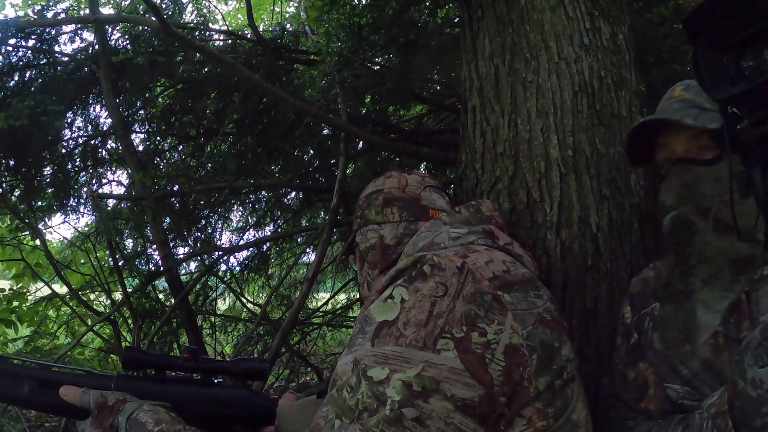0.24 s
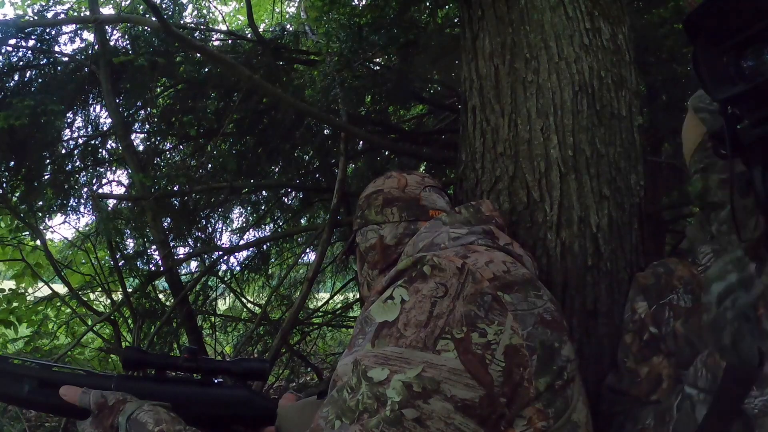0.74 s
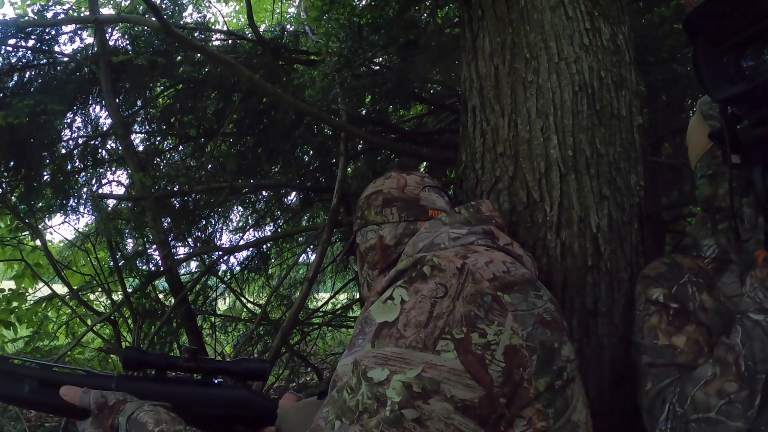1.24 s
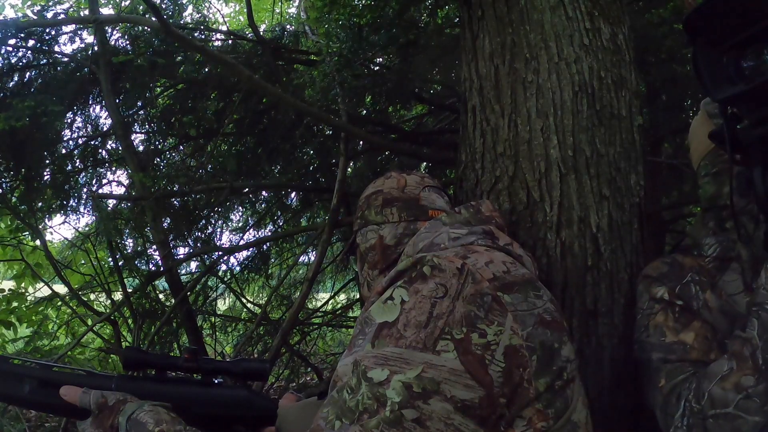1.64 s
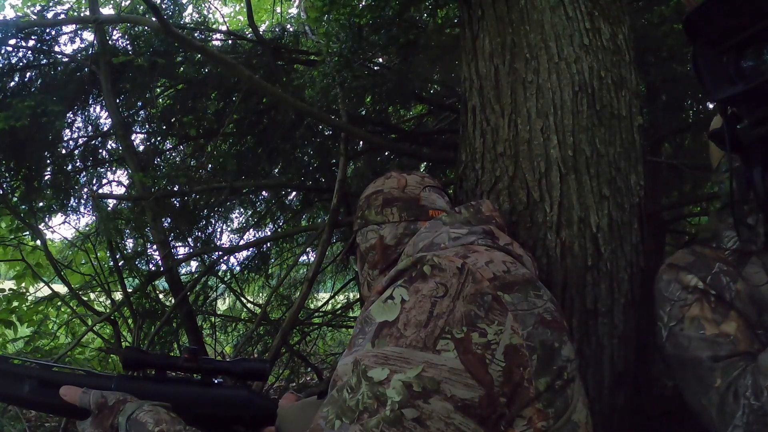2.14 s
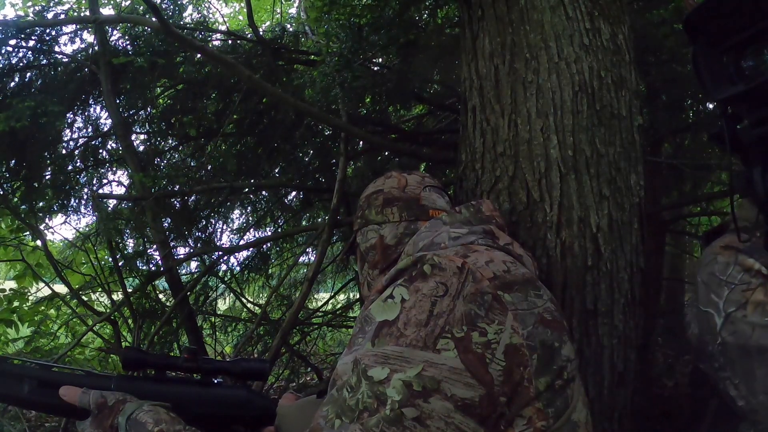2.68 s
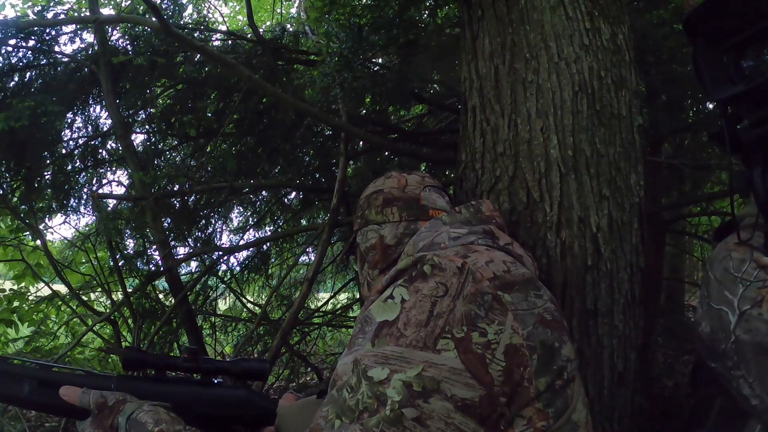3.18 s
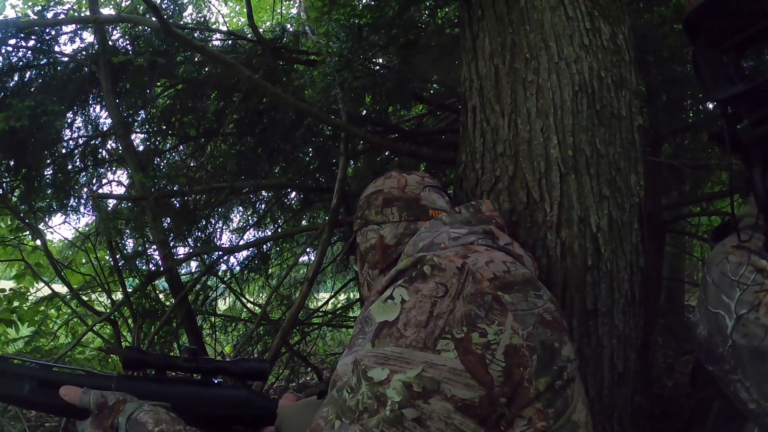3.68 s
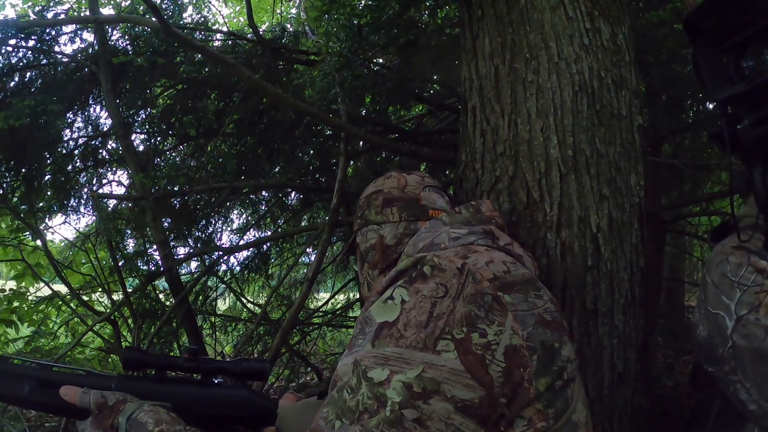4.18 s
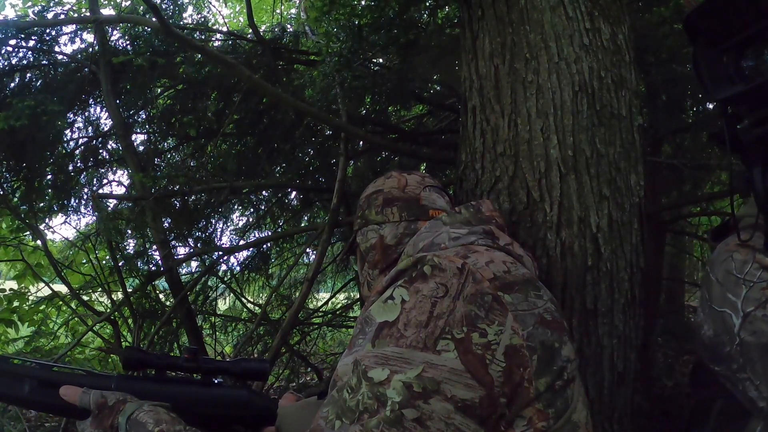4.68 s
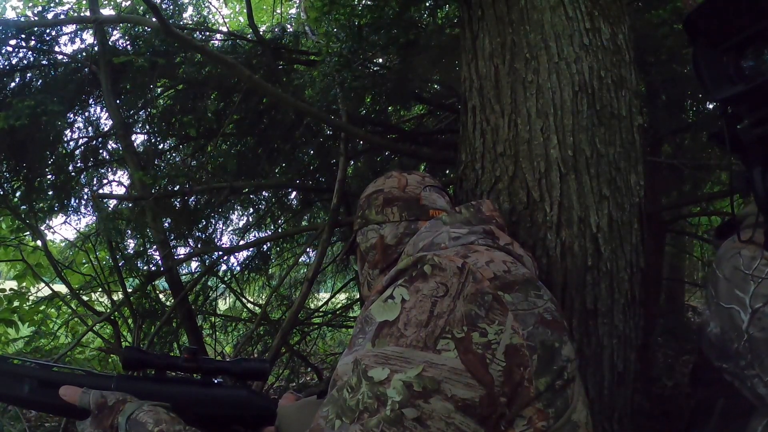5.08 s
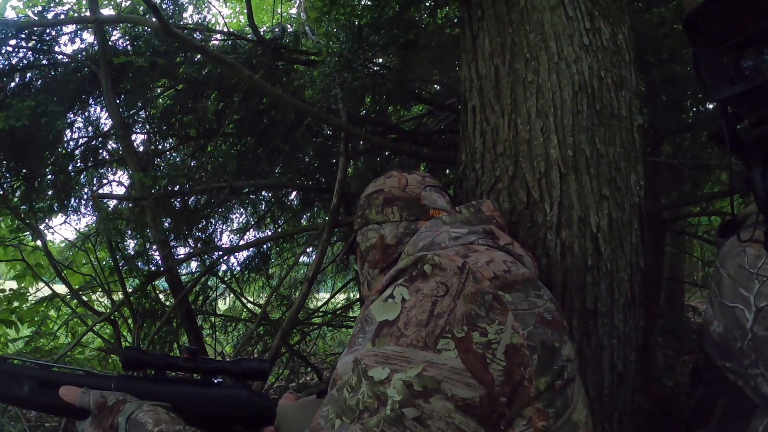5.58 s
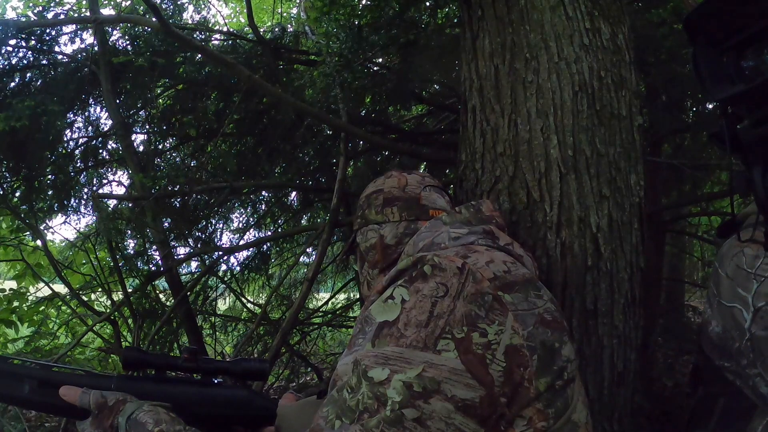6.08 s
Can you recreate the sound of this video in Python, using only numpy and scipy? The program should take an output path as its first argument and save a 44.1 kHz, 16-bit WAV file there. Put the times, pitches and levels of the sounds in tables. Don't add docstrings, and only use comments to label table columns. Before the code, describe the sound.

Summer woods with soft leaf hiss, a low distant drone and thin gliding songbirds. Cloth rubs on bark. A turkey mouth call, close and slightly right, clicks and slides a hoarse whistle, purrs briefly, then gives separate sharp clucks. After a short pause come nine loud, raspy yelps, about three a second, each breaking into loose slaps and a tiny chirp. Faint echo off the trunks.

```python
import sys
import numpy as np
from scipy import signal
from scipy.fft import rfft, irfft, next_fast_len
from scipy.io import wavfile
from scipy.ndimage import uniform_filter1d, minimum_filter1d, map_coordinates

SR = 44100
rng = np.random.default_rng(int(sys.argv[2]) if len(sys.argv) > 2 else 0)


def to_linear_factor(level_db):
    exponent = np.asarray(level_db, float) / 20
    return 10 ** exponent


def materialize(psi):
    bounded = np.clip(np.atleast_2d(psi).T, -1, 1)
    quanta = np.round(bounded * 32767).astype(np.int16)
    wavfile.write(sys.argv[1], SR, quanta)


N = 279153

# (time [s], length [s], pitch [Hz], level [dB], octave [dB])
CLUCKS = [
    (2.185, .012, 640, -6.5, -1.5),
    (2.518, .013, 700, -11, -18),
    (2.854, .017, 640, -10, -1),
]
# (time [s], start pitch [Hz], end pitch [Hz], level [dB], octave [dB])
PURR = [(1.385, 635, 555, -10.5, -7), (1.431, 620, 592, -7.5, -8), (1.4755, 650, 582, -8.5, -1),
        (1.5215, 662, 640, -7.5, -17), (1.5645, 668, 635, -8.5, -18), (1.609, 690, 665, -11, -16)]
PURR_NOTE_S = .026


def unit(x):
    return x / np.sqrt(np.mean(x ** 2) + 1e-20)


def along(points, hz):
    f, v = np.transpose(points)
    return np.interp(np.log(hz + 1), np.log(f + 1), v)


def columns(rows):
    s, *cols = np.transpose(rows)
    start = round(s[0] * SR)
    t = np.arange(start, min(round(s[-1] * SR), N)) / SR
    return start, t, [np.interp(t, s, c) for c in cols]


def wobble(rate, size=N):
    knots = rng.standard_normal(int(N * rate / SR) + 4)
    return map_coordinates(knots, [np.arange(size) * rate / SR])


def filtered(x, response):
    m = next_fast_len(N + 8192)
    return irfft(rfft(x, m) * response(np.fft.rfftfreq(m, 1 / SR)), m)[..., :N]


def add(track, start, x):
    track[start:start + len(x)] += x[:len(track) - start]


def rush(spectrum, patchy_db):
    # (frequency [Hz], correlation [0-1])
    likeness = [(25, .45), (45, .6), (70, .92), (180, .94), (550, .88), (950, .67), (1700, .56), (3000, .4),
                (12000, .3)]
    z = signal.stft(rng.standard_normal((2, N + 512)), nperseg=512)[2]
    field = uniform_filter1d(rng.standard_normal(z.shape[1:]), 6, 0)
    field = uniform_filter1d(field, 12, 1)
    pair = signal.istft(z * to_linear_factor(patchy_db * unit(field)), nperseg=512)[1][:, :N]

    def mid_side_gain(hz):
        turn = np.arccos(np.clip(along(likeness, hz), -1, 1)) / 2
        return to_linear_factor(along(spectrum, hz)) * [np.cos(turn), np.sin(turn)]

    mid, side = filtered(pair, mid_side_gain)
    return unit(np.array([mid + side, mid - side]))


def woods():
    # (frequency [Hz], density [dB per Hz])
    drone_colour = [(12, -21.5), (28, -2.5), (62, -4.5), (73, -4.5), (86, -1.5), (104, -18), (120, -8),
                    (136, -19.5), (200, -16.5), (260, -24.5), (420, -27.5), (800, -39), (1500, -63)]
    # (frequency [Hz], density [dB per Hz])
    leaf_colour = [(200, -50.5), (600, -10.5), (1000, -7), (1600, -7.5), (3200, -3), (5000, -8.5),
                   (6300, -10), (8000, -15.5), (10000, -31), (13000, -56), (15000, -76)]
    # (time [s], level [dB])
    drone_level = [(0.0, -36), (0.14, -40.5), (0.35, -39), (1.57, -40.5), (1.73, -36.5), (2.38, -41.5),
                   (2.89, -36.5), (3.07, -42.5), (3.1, -38), (4.46, -37.5), (4.48, -42), (4.65, -31.5),
                   (4.8, -42), (4.83, -37), (5.38, -42), (6.33, -42.5)]
    # (time [s], level [dB])
    breeze = [(0, -50.5), (1.7, -52), (3.2, -54), (4.07, -52.5), (4.35, -57.5), (5.2, -56.5), (6.33, -56.5)]
    t = np.arange(N) / SR
    drone_db = np.interp(t, *np.transpose(drone_level))
    leaves_db = np.interp(t, *np.transpose(breeze))
    drone = to_linear_factor(drone_db + 1.2 * wobble(3)) * rush(drone_colour, patchy_db=1.5)
    return drone + to_linear_factor(leaves_db + 1.5 + .5 * wobble(6)) * rush(leaf_colour, patchy_db=.7)


def bird_notes():
    # (time [s], length [s], pitch [Hz], level [dB])
    whistles = [(.24, .16, 3850, -62), (.43, .06, 2260, -65), (.53, .07, 2210, -65), (.7, .15, 3835, -58),
                (.96, .06, 3850, -62), (1.175, .125, 3860, -59), (1.57, .04, 3520, -59),
                (2.11, .16, 2930, -63), (2.775, .055, 3830, -63), (3.04, .1, 2150, -64),
                (3.52, .06, 2850, -60), (3.78, .04, 2900, -65), (5.27, .055, 2850, -61)]
    # (time [s], length [s], start pitch [Hz], end pitch [Hz], level [dB])
    glides = [(.06, .07, 2700, 2050, -61), (.13, .13, 2030, 2300, -61), (.245, .022, 3300, 2350, -54),
              (.295, .05, 2400, 3500, -52.5), (.355, .04, 3450, 3230, -54), (1.39, .04, 4200, 3300, -58),
              (1.54, .03, 2900, 3550, -59), (1.58, .03, 2500, 2350, -56), (2.21, .035, 3300, 3800, -63),
              (2.25, .02, 3400, 3100, -62), (2.39, .06, 2600, 4000, -60), (2.74, .07, 2900, 3180, -60),
              (2.825, .02, 2350, 2550, -57), (2.875, .045, 3350, 2700, -57), (3.375, .038, 3000, 3500, -57),
              (3.47, .05, 4200, 2850, -59), (4.44, .06, 4650, 5250, -60), (5.67, .04, 3100, 3550, -58),
              (6.265, .04, 4300, 3800, -62), (3.31, .06, 3450, 2300, -62), (3.77, .06, 3300, 3750, -64),
              (3.85, .05, 3780, 3620, -60), (4.05, .055, 2600, 3450, -60.5), (4.105, .05, 3450, 2900, -60)]
    # (time [s], length [s], start pitch [Hz], turn pitch [Hz], end pitch [Hz])
    warbles = [(.17, .075, 3500, 2500, 3500), (1.3, .09, 3500, 3200, 4200), (2.68, .095, 3330, 2830, 3800),
               (5.89, .06, 3500, 2900, 3600)]
    dwell, warble_db = .18, -54

    def corners(s, length, *hz):
        count = len(hz)
        share = np.repeat(np.linspace(0, 1, count), 2) + dwell / 2 * np.tile([-1, 1], count)
        times = s + length * np.clip(share, 0, 1) + 1e-6 * np.arange(2 * count)
        return list(zip(times, np.repeat(hz, 2)))

    return ([(db, corners(s, length, hz, hz)) for s, length, hz, db in whistles]
            + [(db, corners(s, length, *hz)) for s, length, *hz, db in glides]
            + [(warble_db, corners(*warble)) for warble in warbles])


def birds():
    out = np.zeros((2, N))
    for db, path in bird_notes():
        start, t, (hz,) = columns(path)
        unsteady = .04 * np.ptp(hz) * wobble(50, size=len(t))
        phase = 2 * np.pi * np.cumsum(uniform_filter1d(hz, 300) + unsteady) / SR
        swell = to_linear_factor(db + 6 + 3 * wobble(45, size=len(t))) * signal.windows.tukey(len(t), .16)
        for ear, turn in zip(out, rng.uniform(0, 1.5, 2)):
            add(ear, start, swell * np.sin(phase + turn))
    return out


def trunks(x, gap):
    # (frequency [Hz], time to fall 60 dB [s])
    decay = [(500, .06), (900, .17), (1400, .38), (2200, .3), (5000, .071)]
    hz, t, z = signal.stft(rng.standard_normal((2, SR // 2)), SR, nperseg=256)
    fade = to_linear_factor(-60 * t / along(decay, hz)[:, None])
    tail = signal.istft(z * fade, SR, nperseg=256)[1]
    late = np.pad(x, ((0, 0), (round(gap * SR), 0)))
    return signal.fftconvolve(late, tail / np.linalg.norm(tail[0]), axes=1)[:, :N]


def cloth():
    # (start time [s], end time [s], level [dB])
    rustles = [
        (0.126, .448, -53),
        (1.02, 1.267, -42.5),
        (1.282, 1.626, -48.5),
    ]
    # (frequency [Hz], density [dB per Hz])
    cloth_colour = [(300, -29.5), (1000, -6.5), (2500, 1), (5000, -7.5), (8000, -21.5), (12000, -41.5),
                    (15000, -77.5)]
    gate = np.zeros(N)
    for start, end, db in rustles:
        add(gate, round(start * SR), to_linear_factor(db) * signal.windows.tukey(round((end - start) * SR), .5))
    grain = unit(to_linear_factor(2.2 * wobble(160)))
    return gate * grain * rush(cloth_colour, patchy_db=3)


def ticks():
    # (time [s], peak [dB], ring [Hz])
    clicks = [(0.969, -27, 500), (1.062, -14.5, 910), (1.078, -41, 3500), (1.148, -26, 2950),
              (1.16, -45.5, 3600), (1.215, -44, 2600), (1.326, -42.5, 1400), (1.353, -32, 1000),
              (1.894, -25, 314), (3.312, -39, 1500), (3.412, -42.5, 1490), (3.551, -32.5, 1082),
              (3.856, -38, 1860), (4.205, -31, 1900), (4.521, -38.5, 2054), (4.826, -44.5, 1800),
              (5.777, -33, 1205), (6.089, -36.5, 1000)]
    pops = [(s - .013, db - 25, 473) for s, _, _, db, _ in CLUCKS]
    out, t = np.zeros(N), np.arange(500) / SR
    for s, db, hz in clicks + pops:
        dull = np.convolve(rng.standard_normal(len(t)), np.hanning(13) / 5.5, 'same')
        hardness = np.clip(to_linear_factor(db + 22), .5, 2.5)
        crack = hardness * dull * to_linear_factor(-60 * t / .005)
        ring = np.sin(2 * np.pi * hz * t) * to_linear_factor(-60 * t / .024)
        add(out, round(s * SR), to_linear_factor(min(db, -24)) * ring + to_linear_factor(db) * crack)
    return out


def strokes():
    # (end time [s], level [dB])
    leaks = [
        (.998, -36),
        (1.894, -31),
        (2.186, -31),
        (2.519, -33),
        (2.854, -33),
    ]
    # (time [s], rate [slaps per s], level [dB], roughness [0-1], upper mouth [dB])
    whistle_rasp = [
        (1.15, 300, -38, .8, -4),
        (1.172, 300, -24, .6, -6),
        (1.193, 300, -25, .7, -6),
        (1.212, 300, -40, .8, -6),
    ]
    half_step = [(3.6, 393, -18, .14, 5), (3.652, 375, -17, .14, 1)]
    # (time [s], length [s], rate [slaps per s], level [dB], fade [dB])
    hoarse = [
        (1.62, 0.04, 317, -28.5, -17),
        (3.888, .049, 242, -12, 0),
        (4.2282, .059, 265, -10, -1),
    ]
    # (time [s], length to the break [s], first and last rate [slaps per s], level [dB])
    yelps = [(4.537, 0.058, 350, 334.4, -9), (4.85, 0.05, 345, 325.8, -7.5),
             (5.172, 0.073, 354.2, 303, -8.5), (5.488, .076, 351.4, 306.8, -8),
             (5.801, .068, 339.5, 323.7, -8), (6.113, 0.073, 346.8, 314.8, -7.5)]
    # (rough catch [s], whole length [s], lips [dB])
    yelp_edges = [(.024, .0655, 5), (.012, .063, -1), (.012, .083, 2.5), (.016, .081, 2.5), (.017, .085, 2),
                  (.018, .075, 3)]
    buzz = (309.7, -36, .3, -15)
    calls = [[(PURR[0][0], *buzz), (PURR[-1][0] + PURR_NOTE_S, *buzz)], half_step, whistle_rasp]
    for s, db in leaks:
        calls.append([(s - .018, 300, db - 12, .8, -10), (s, 300, db, .8, -10)])
    for s, length, hz, db, _ in CLUCKS:
        tail_db, tail_s = db - 14, s + .8 * length
        calls.append([(tail_s, hz / 2, tail_db, .6, -7.5),
                      (tail_s + .012, hz / 2, tail_db - 10.5, .8, -5.5)])
    for s, length, rate, db, fade_db in hoarse:
        calls.append([(s + u * length, rate, db + down * fade_db, .25 + .25 * u, 4.5 + u * fade_db * .6)
                      for u, down in [(0, 0), (.53, .15), (1, 1)]])
    settle_s = .008
    for (s, length, first, last, db), (catch, whole, lips_db) in zip(yelps, yelp_edges):
        settled = catch + settle_s
        second = np.interp(settled, (catch, length), (first, last))
        open_db, shut_db = 1 + lips_db, -12 + lips_db
        break_db = db - 4 - 300 * (whole - length)
        calls.append([(s, first, db - 5.5, .8, open_db - 1.2),
                      (s + catch, first, db - 3, .3, open_db - 1),
                      (s + settled, second, db, .04, open_db),
                      (s + length, last, db - 4, .06, shut_db),
                      (s + whole, last * .96, break_db, .4, -12)])
    return calls


def loose_slaps():
    # (time [s], peak [dB], upper mouth [dB])
    early_stutters = [(1.8945, -10, -7), (1.897, -18, -1), (1.9, -13, -6), (3.6687, -8, -5),
                      (3.6732, -14, 4), (3.6757, -11, 2), (3.6794, -16, 2), (3.6885, -15, -7),
                      (3.9396, -4, 3), (3.9438, -6, 2), (3.9493, -7, 1), (3.9549, -8, 1), (3.963, -5, 0),
                      (3.9725, -7, 1), (3.9778, -9, 0), (3.9832, -11, 2), (3.9895, -11, -2),
                      (4.2894, -8, 0), (4.2923, -5, -4), (4.2977, -7, -2), (4.3009, -12, -2),
                      (4.305, -13, -2), (4.3116, -14, -4), (4.3216, -17, -8)]
    # (time [s], peak [dB], upper mouth [dB])
    late_stutters = [(4.604, -8, -6), (4.6087, -8, -7), (4.615, -10, -3), (4.6187, -14, -6),
                     (4.6226, -13, -9), (4.627, -13, -11), (4.6393, -17, -18), (4.6432, -21, -6),
                     (4.914, -7, -8), (4.9175, -6, -6), (4.9206, -7, -8), (4.9257, -5, -12),
                     (4.9312, -9, -17), (4.9341, -8, -16), (4.9377, -8, -14), (4.9485, -12, -22),
                     (5.257, -10, -10), (5.2601, -11, -9), (5.2641, -15, -13), (5.2769, -14, -9),
                     (5.2851, -16, -13), (5.5702, -8, -4), (5.5784, -9, -6), (5.5965, -15, -8),
                     (5.5998, -16, -10), (5.8901, -9, -11), (5.8956, -9, -13), (5.9074, -14, -10),
                     (5.9157, -11, -20), (6.1892, -5, -11), (6.1928, -8, -15), (6.1982, -7, -16),
                     (6.2012, -7, -16), (6.2095, -11, -13), (6.2123, -10, -17), (6.2174, -9, -18),
                     (6.2383, -15, -15)]
    taps = [(1.477 + k * .0455, -9.5, -21, 1.1) for k in range(4)]
    return taps + [(*slap, .95) for slap in early_stutters] + [(*slap, .72) for slap in late_stutters]


def slaps():
    rows = [(s, db - 6.5, .2, upper_db, damping) for s, db, upper_db, damping in loose_slaps()]
    for call in strokes():
        luck = rng.standard_normal((120, 2))
        _, t, (rate, db, rough, upper_db) = columns(call)
        rows += [(t[0] - .0045, db[0] - 20, .3, -12, 1), (t[0] - .011, db[0] - 30, .3, -12, 1)]
        cycles = np.cumsum(rate) / SR
        at = np.flatnonzero(np.diff(np.floor(cycles), prepend=-1))
        late = (cycles[at] % 1) / rate[at]
        jitter = .3 * rough[at] * luck[:len(at), 0] / rate[at]
        loss_db = 5 * np.abs(rough[at]) * np.abs(luck[:len(at), 1])
        size_db = db[at] - loss_db - 10 * np.log10(rate[at] / 330)
        rows += list(zip(t[at] - late + jitter, size_db, rough[at], upper_db[at], np.ones(len(at))))
    return np.transpose(rows)


def rasp():
    # (frequency [Hz], width [Hz], level [dB])
    lower_mouth = [(319, 320, -26.5), (725.3, 116, -10), (1000, 183, 2.5), (1296, 147, -8.5)]
    # (frequency [Hz], width [Hz], level [dB])
    upper_mouth = [(1556, 118, -6), (1940, 215, -5)]
    # (frequency [Hz], width [Hz], level [dB])
    teeth = [(3560, 250, -30), (4880, 190, -35), (6600, 450, -48)]
    # (frequency [Hz], density [dB per Hz])
    break_hiss = [(1500, -44.5), (2700, -14.5), (3500, -11.5), (4300, -16.5), (4900, -8.5), (5600, -14.5),
                  (7000, -18), (9000, -32.5), (12000, -44.5), (14000, -66)]
    # (time [s], level [dB])
    bite = [(0, -6), (4.4, -1), (4.5, 8.5), (6.33, 7)]
    # (time [s], level [dB])
    jaw = [(4.35, 0), (4.5, 1.5), (5.3, 1.5), (5.8, 3), (6.33, 4)]
    # (time [s], level [dB])
    tongue = [(3.6, -2), (3.7, 0), (3.89, -3), (3.99, 1), (4.23, -2), (4.32, 4), (4.54, -5), (4.63, 1),
              (4.85, 0), (4.94, 3), (5.17, -4), (5.26, 7), (5.49, -3), (5.58, 6), (5.8, 0), (5.9, -2),
              (6.11, -1), (6.21, -1)]
    jaw_share = [0, 1, 0, -1, -1, 0, 0, 0, 0]
    tongue_share = [0, 0, 0, 1, 1, 0, 0, 0, 0]
    s, db, rough, upper_db, damping = slaps()[:, :, None]
    index = np.ceil(s * SR).astype(int) + np.arange(900)
    t = index / SR - s
    luck = rng.standard_normal((9, 600, 2))[:, :len(s)]
    bite_db = np.interp(s, *np.transpose(bite))
    jaw_db = np.interp(s, *np.transpose(jaw))
    tongue_db = np.interp(s, *np.transpose(tongue))
    ring = np.zeros(t.shape)
    for k, mode in enumerate(lower_mouth + upper_mouth + teeth):
        hz, width, mode_db = mode
        u = 2 * np.pi * width * damping * t
        mode_db = mode_db + upper_db * (mode in upper_mouth) + bite_db * (mode in teeth)
        mode_db = mode_db + jaw_share[k] * jaw_db + tongue_share[k] * tongue_db
        gain = to_linear_factor(mode_db + 6.3 * rough * luck[k, :, :1])
        detuned = hz * (1 + .055 * rough * luck[k, :, 1:])
        ring += gain * u ** 2 * np.exp(-u) * np.sin(2 * np.pi * detuned * t + k * np.pi)

    def spread(x):
        return np.bincount(index.ravel(), (to_linear_factor(db) * x).ravel(), N + 1000)[:N]

    def cheeks(hz):
        return 1 - .7 * np.exp(-((hz - 2620) / 330) ** 2)

    air = unit(filtered(rng.standard_normal(N), lambda hz: to_linear_factor(along(break_hiss, hz))))
    puff_db = bite_db + .6 * (db + 10)
    puff = spread(to_linear_factor(puff_db) * t / .0015 * np.exp(-t / .0015))
    return 1.8 * filtered(spread(ring), cheeks) + to_linear_factor(-31) * puff * air


def tone(hz, db, octave_db):
    # (frequency [Hz], level [dB])
    overtones = [(1500, -19), (2050, -20.5), (2350, -44), (2900, -50), (3600, -54)]
    phase = 2 * np.pi * np.cumsum(hz) / SR
    upper = sum(to_linear_factor(along(overtones, k * hz)) * np.cos(k * phase - k) for k in range(3, 6))
    halves = to_linear_factor(-33.0) * np.sin(phase / 2) + to_linear_factor(-27.5) * np.sin(3 * phase / 2)
    strained = to_linear_factor(1.5 * (db + 9)) * (upper + halves)
    octave = to_linear_factor(octave_db) * np.cos(2 * phase + 1.9)
    return np.sqrt(2) * to_linear_factor(db) * (np.sin(phase) + octave + strained)


def notes():
    # (time [s], length [s], start pitch [Hz], level [dB], octave [dB])
    openers = [(.996, .03, 850, -12.5, -14), (1.364, .013, 651, -16, -8), (3.579, 0.02, 1000, -34, -8.5),
               (4.531, .034, 891, -11.5, -28.5), (5.465, 0.026, 1240, -21.5, -24),
               (5.168, .013, 960, -13.5, -25), (5.488, .011, 880, -14, -20), (5.8, .016, 860, -13, -20),
               (6.111, .016, 900, -12, -20)]
    # (time [s], length [s], start pitch [Hz], end pitch [Hz], level [dB], octave [dB])
    first_yelp = (3.599, .056, 790, 748, -16.5, 3)
    # (time [s], length [s], start pitch [Hz], end pitch [Hz], level [dB])
    chirps = [(1.626, 0.034, 676, 700, -16), (1.663, 0.015, 840, 797, -24.5), (1.907, 0.025, 640, 620, -33),
              (2.525, .008, 1035, 1117, -14), (3.688, 0.026, 900, 1087, -21), (4.001, 0.016, 970, 980, -38),
              (4.312, 0.027, 850, 1000, -29), (4.956, 0.024, 933, 1060, -28), (5.29, 0.015, 973, 1008, -36),
              (5.599, 0.028, 764, 1016, -22), (5.926, 0.022, 960, 1000, -15.5),
              (6.242, 0.016, 912, 970, -20)]
    note_sag, cluck_sag = .13, .05
    scoop = .16
    return ([(s, length, hz, hz * (1 - note_sag), db, octave_db, 0)
             for s, length, hz, db, octave_db in openers]
            + [(s, PURR_NOTE_S, *rest, scoop) for s, *rest in PURR]
            + [(*first_yelp, 0)]
            + [(s, length, hz, hz * (1 - cluck_sag), db, octave_db, scoop / 2)
               for s, length, hz, db, octave_db in CLUCKS]
            + [(*chirp, -27, 0) for chirp in chirps])


def reed_song():
    # (time [s], pitch [Hz], level [dB], octave [dB])
    slide = [(1.024, 741, -36, -28), (1.049, 741, -27, -21), (1.085, 681, -23, -7.5),
             (1.107, 645, -24.5, -12.5), (1.146, 736, -16.5, -20), (1.154, 743, -22, -22),
             (1.172, 759, -13, -25.5), (1.2, 858, -18.5, -16), (1.224, 1070, -38, -26)]
    whistle_breaks = (1.154, 1.196)
    # (start pitch [Hz], end pitch [Hz], level [dB])
    hum_start, hum_end, hum_db = (585, 640, -33)
    out = np.zeros(N)
    start, t, (hz, db, octave_db) = columns(slide)
    gaps = np.prod([1 - .85 * np.exp(-((t - s) / .002) ** 2) for s in whistle_breaks], axis=0)
    add(out, start, gaps * signal.windows.tukey(len(t), .06) * tone(hz, db, octave_db))

    start, t, (hz,) = columns([(PURR[0][0] - .012, hum_start), (PURR[-1][0] + .01, hum_end)])
    hum_hz = hz + 25 * wobble(90, size=len(t))
    hum = tone(hum_hz, hum_db + 3 * wobble(90, size=len(t)), -9)
    add(out, start, signal.windows.tukey(len(t), .1) * hum)

    for s, length, hz0, hz1, db, octave_db, scoop in notes():
        start, t, (hz, u) = columns([(s, hz0, 0), (s + length, hz1, 1)])
        rounded = min(1 - .11 * (db + 10), (.045 / length) ** 2)
        rounded = np.clip(max(rounded, .023 / length), .6, 2)
        swell = np.tanh(1.6 * np.sin(np.pi * u) ** (1.1 * rounded)) * to_linear_factor(-2 * u)
        bend = 1 - scoop * np.exp((s - t) / .003) + .016 * wobble(110, size=len(t))
        note_db = db + .4 * wobble(150, size=len(t))
        add(out, start, swell * tone(hz * bend, note_db, octave_db - 12 * u ** 4))
    return out


def scene():
    # (time [s], left ear lag [samples])
    left_lag = [(0, 2), (3.4, 2.4), (4.5, 3.6), (6.33, 4)]
    call = reed_song() + ticks()
    call = call + filtered(rasp(), lambda hz: 1 / (1 + (290 / (hz + 1)) ** 6))
    s, lag = np.transpose(left_lag)
    sample = np.arange(N)
    left = map_coordinates(call, [sample - np.interp(sample / SR, s, lag)])
    near = np.array([left, call]) * to_linear_factor([[-1.8], [1.6]])
    far, (hiss_left, hiss_right) = birds(), woods()
    around = np.array([np.roll(hiss_left, 3), hiss_right])
    far_echo = to_linear_factor(-.3) * trunks(far, gap=.02)
    near_echo = to_linear_factor(-25.0) * trunks(near, gap=.014)
    return near + near_echo + far + far_echo + around + cloth()


def roll_off(x):
    return signal.sosfilt(signal.butter(12, 14000, fs=SR, output="sos"), x)


def record(dry):
    # (time [s], level [dB])
    overloads = [
        (4.243, -18.5),
        (4.283, -26.5),
    ]
    need = np.minimum(1, .96 / (np.abs(dry).max(axis=0) + 1e-9))
    held = dry * uniform_filter1d(minimum_filter1d(need, size=180), size=180)
    for s, db in overloads:
        add(held[1], round(s * SR), to_linear_factor(db) * np.hanning(6))
    return roll_off(held)


dry = scene()
out = record(dry)
materialize(out)
```